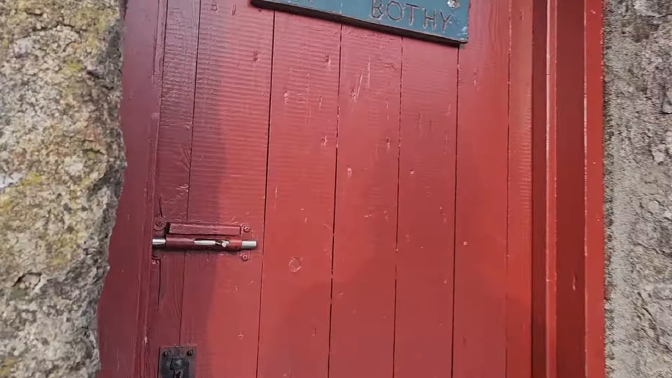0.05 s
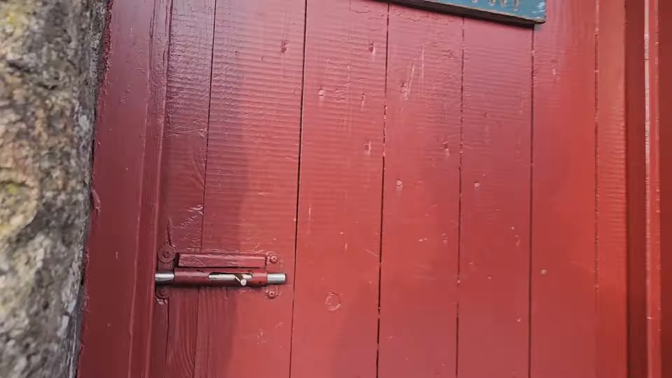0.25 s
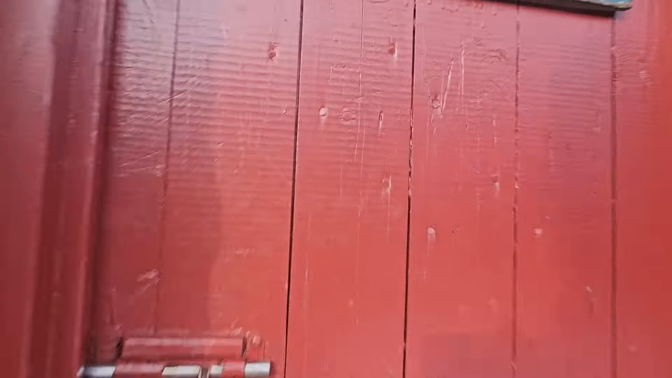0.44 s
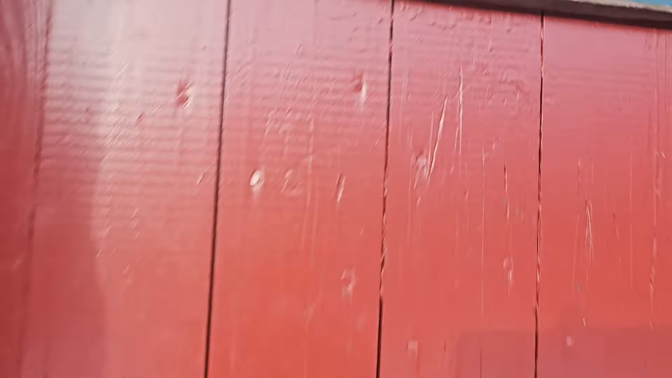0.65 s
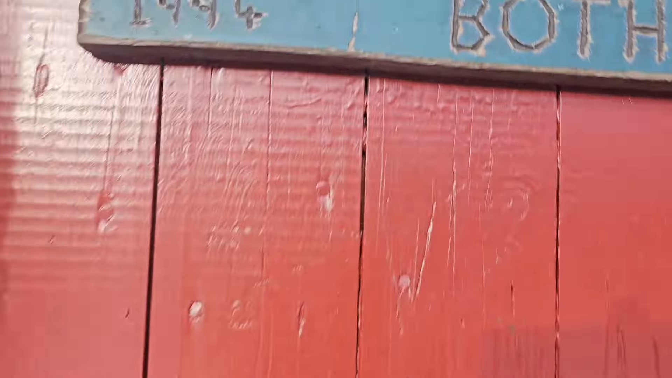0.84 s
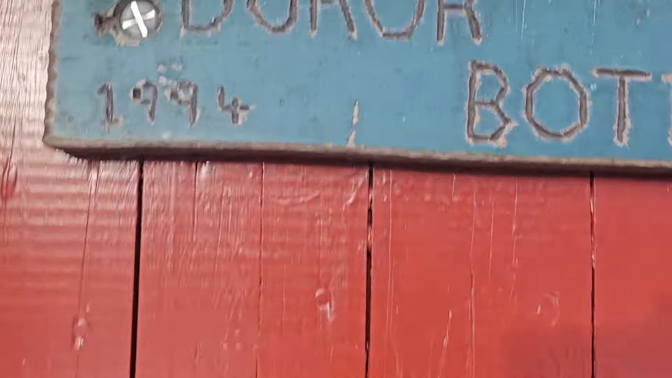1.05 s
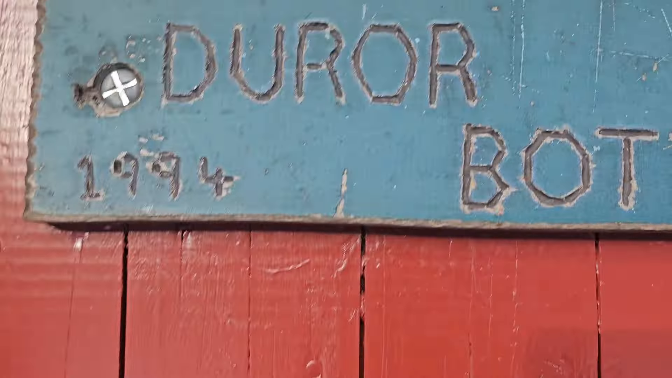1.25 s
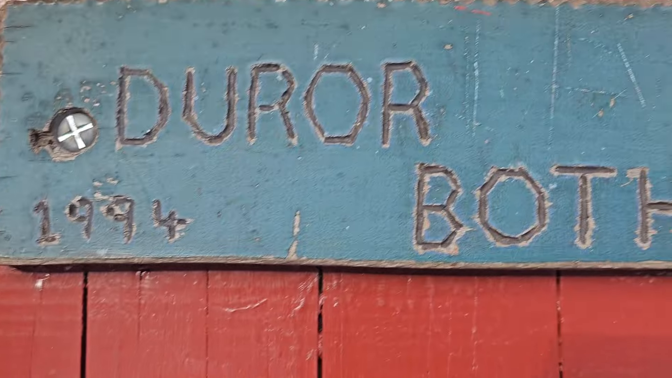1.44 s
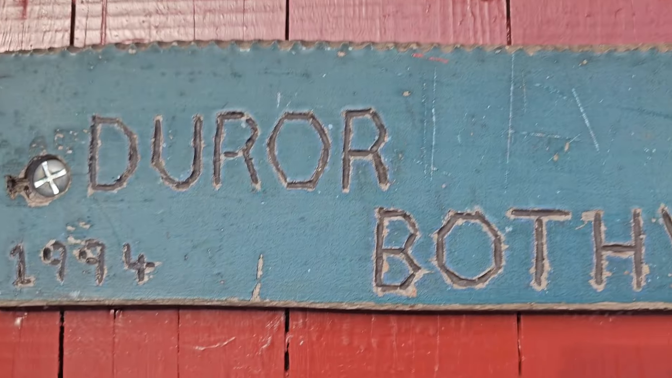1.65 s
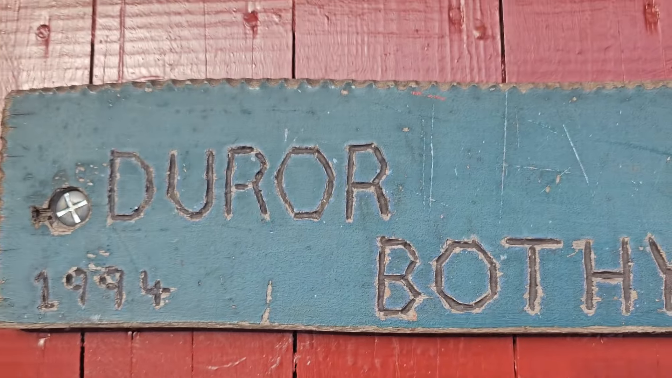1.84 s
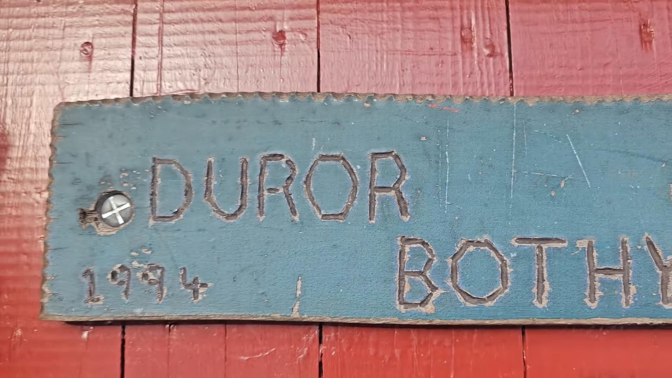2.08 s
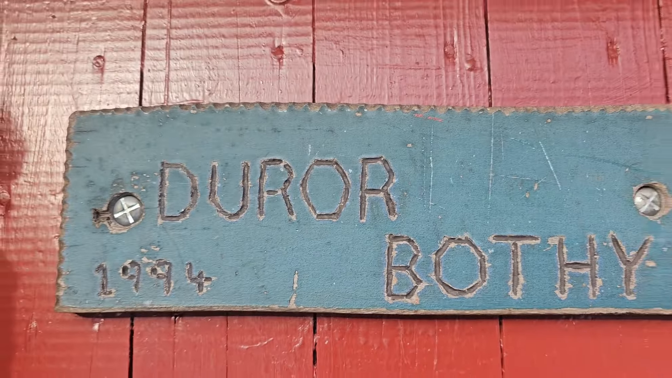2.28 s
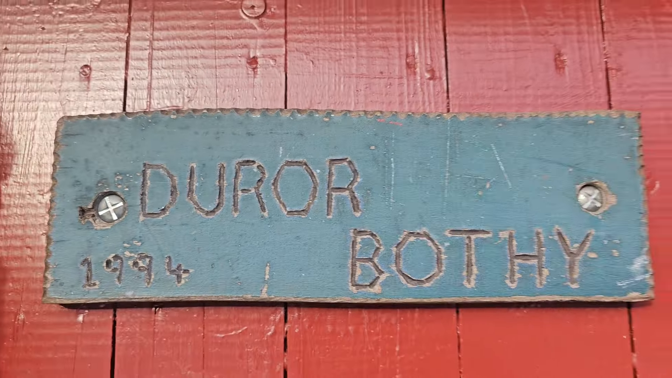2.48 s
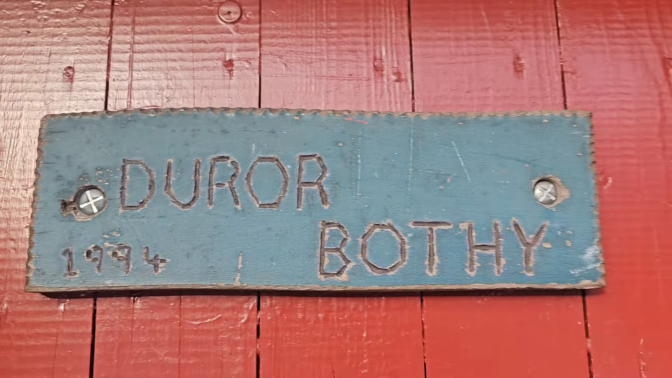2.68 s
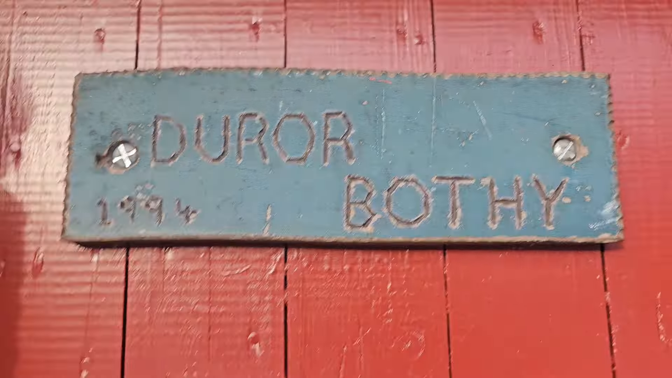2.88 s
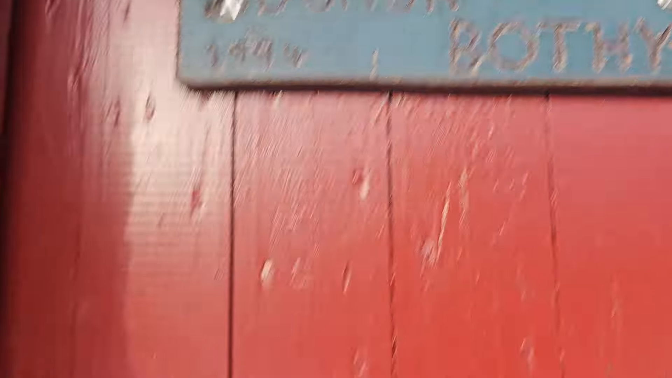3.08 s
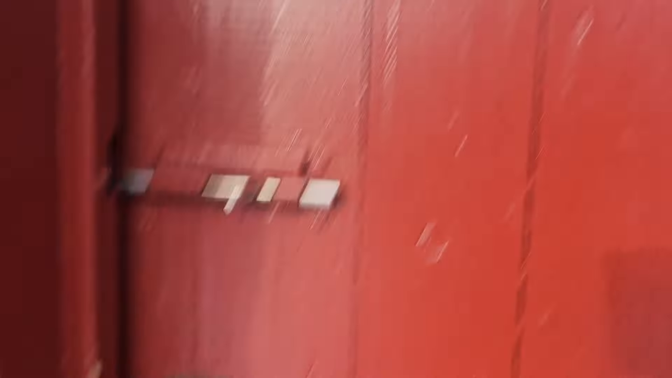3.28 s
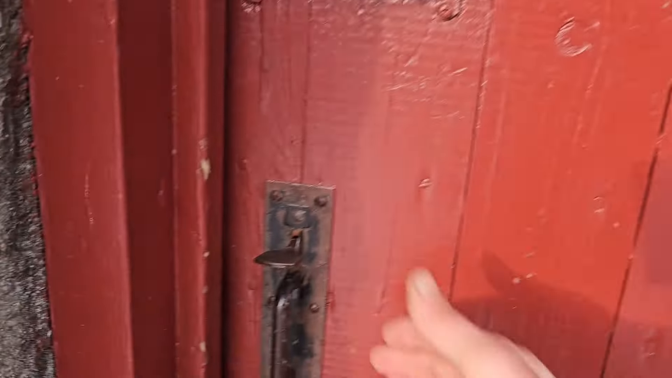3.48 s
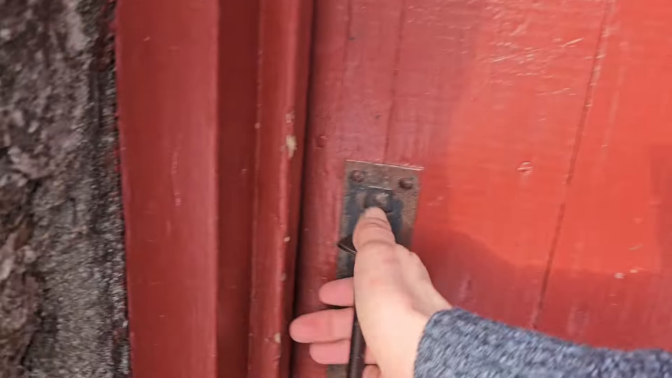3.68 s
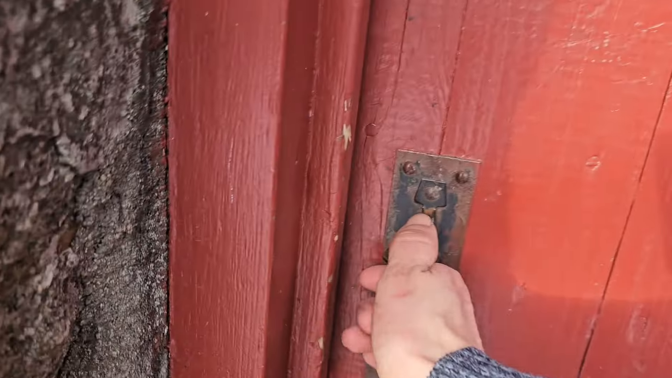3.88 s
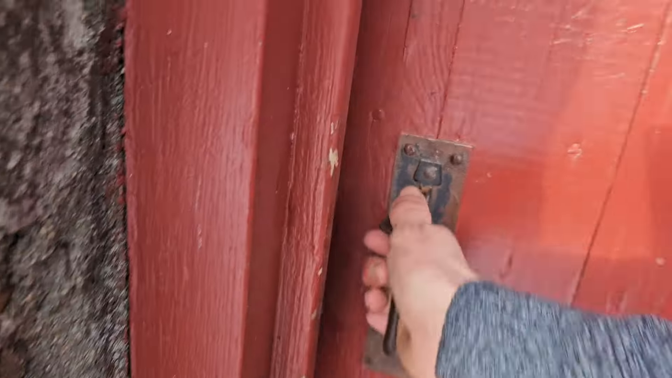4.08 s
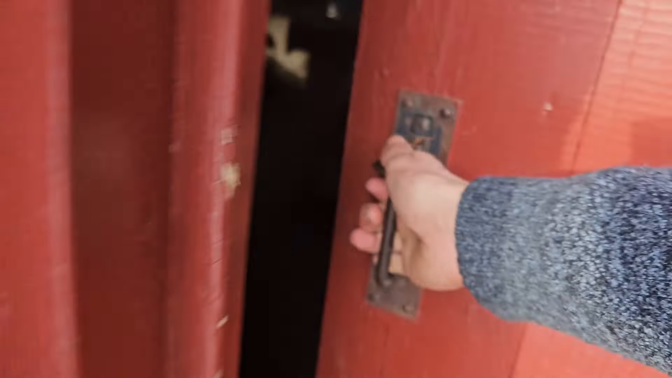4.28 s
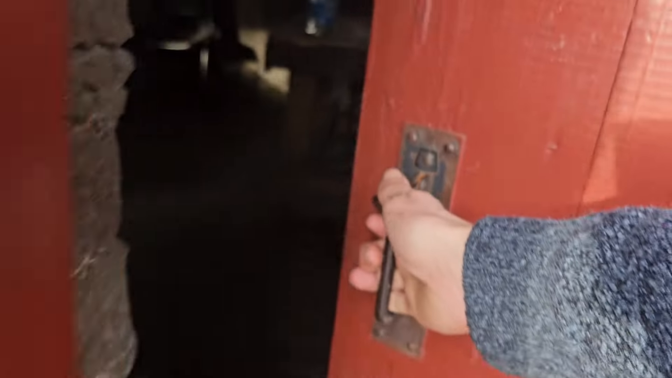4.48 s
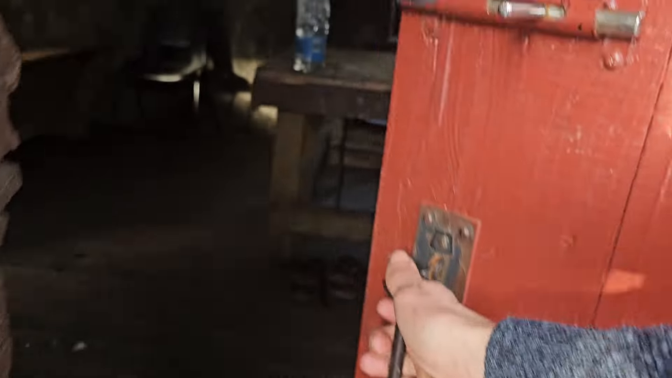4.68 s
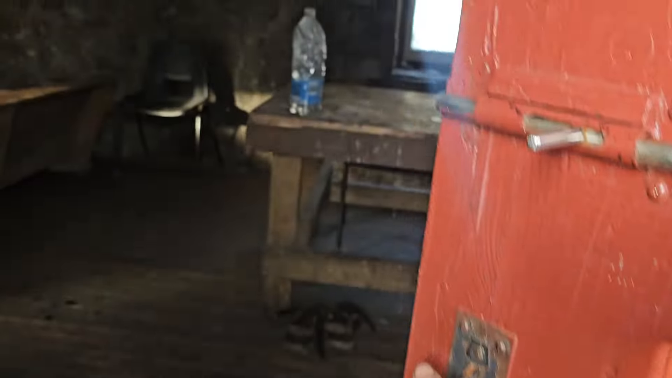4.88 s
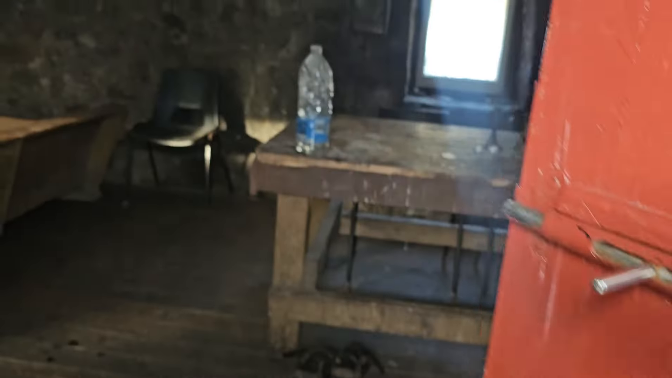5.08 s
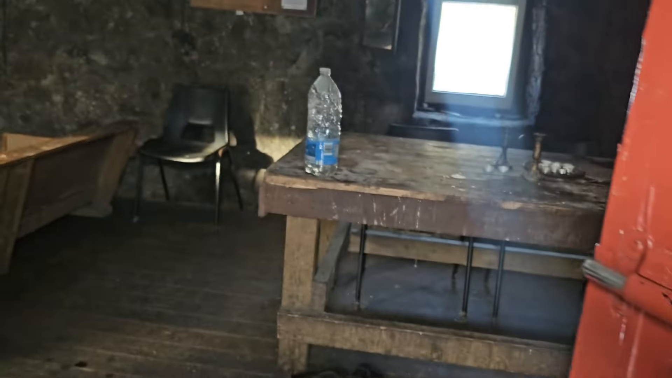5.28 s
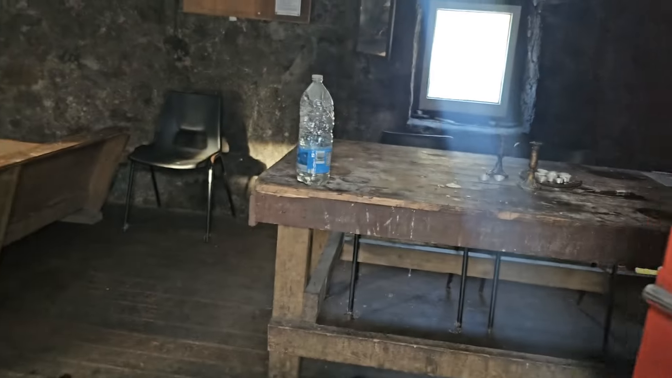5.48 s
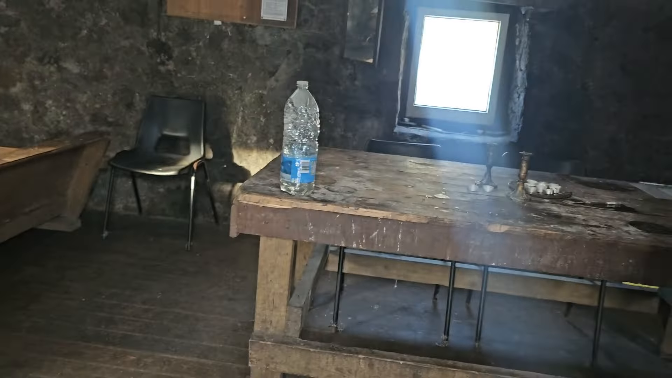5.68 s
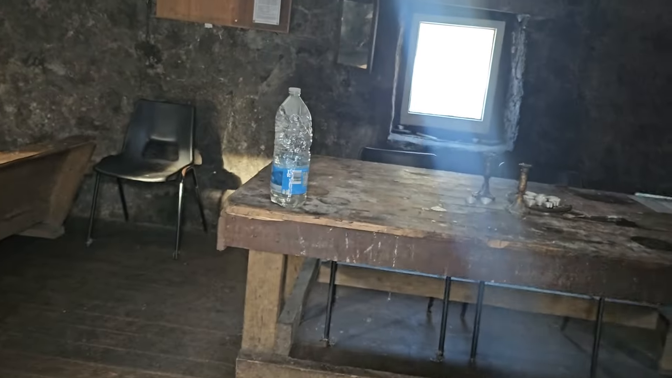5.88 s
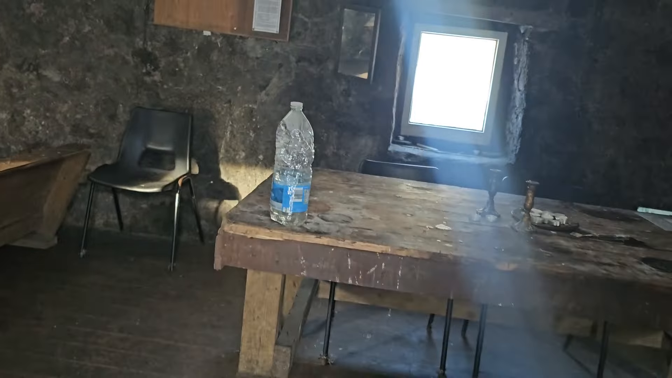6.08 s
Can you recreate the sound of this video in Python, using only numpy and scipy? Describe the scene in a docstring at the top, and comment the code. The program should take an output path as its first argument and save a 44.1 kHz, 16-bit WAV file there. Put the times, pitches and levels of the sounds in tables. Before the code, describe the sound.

Close handheld stereo microphone at a plank door in a stone wall. Soft thumps and grit crunches of shoes in the first second, faint distant air, light wind. After a quiet pause the iron thumb latch bangs in a rapid, bright cluster with woody knocks; a lighter cluster follows as the door scrapes free. The bare room echoes, hinges tick faintly, and loose iron rattles quietly before near-silence.

```python
"""At the plank door of a stone hut, someone steps up, presses the iron thumb latch and pushes the door open.
Latch blows are fading tones of planks, plate and bar plus short bursts of noise; they also echo in the bare room.
The door scrapes free in stick-slip jerks and its hinges tick; shoes thump and crunch on gritty stone.
Shaped noise makes the rustle of a sleeve, a little wind on the microphone and a distant rush of air."""
import sys
import numpy as np
from scipy import signal
from scipy.fft import rfft, irfft, next_fast_len
from scipy.io import wavfile
from scipy.ndimage import uniform_filter1d

SR = 44100
rng = np.random.default_rng(int(sys.argv[2]) if len(sys.argv) > 2 else 0)


def pcm_store(signal):
    """Save signal as 16-bit PCM."""
    levels = np.round(np.clip(np.atleast_2d(signal), -1, 1) * 32767)
    wavfile.write(sys.argv[1], SR, levels.astype(np.int16).T)


N = 270583  # length of the scene in samples
T = np.arange(SR // 2) / SR  # half a second of time, for short sounds [s]

# noise colour of the iron's clank, from dense short-lived tones: (frequency [Hz], level per Hz [dB])
CLANK_COLOUR = [(60, -32.5), (200, -14), (450, -10.5), (750, -4.5), (1250, 2.5), (2000, -11), (2800, -16),
                (4500, -25.5), (9000, -39.5)]


def amp(db):
    """Turns decibels into a plain multiplier."""
    return 10 ** (np.asarray(db) / 20)


def read(points, hz):
    """Reads a table between its points, with frequency spaced by octaves as the ear hears it."""
    f, value = np.transpose(points)
    return np.interp(np.log(hz + 1), np.log(f), value)


def unit(x):
    """Scales a stereo sound to the energy of ten milliseconds at full level."""
    energy = np.sum(x ** 2)
    return x / np.sqrt(energy / (2 * .01 * SR) + 1e-20)


def add(mix, s, sound):
    """Mixes a stereo sound in at time s, cutting off what runs past the end."""
    part = mix[:, max(round(s * SR), 0):][:, :sound.shape[1]]
    part += sound[:, :part.shape[1]]


def colour(x, spectrum, tilt_db=0, alike=None):
    """Gives two unrelated signals a spectrum and sets how alike left and right are at each pitch."""
    # used unless another table is given: (frequency [Hz], left-right correlation [-1 to 1])
    usual_alike = [(100, 0.97), (250, 0.89), (600, 0.86), (1200, 0.24), (2500, 0.17), (8000, 0.11)]
    size = next_fast_len(x.shape[1])
    hz = np.fft.rfftfreq(size, 1 / SR)
    a, b = rfft(x, size)
    angle = np.arccos(np.clip(read(alike or usual_alike, hz), -1, 1)) / 2
    shared, opposed = a * np.cos(angle), b * np.sin(angle)
    stereo = np.array([shared + opposed, shared - opposed])
    level_db = read(spectrum, hz) + tilt_db * np.log2(hz / 1000 + .1)
    return irfft(stereo * amp(level_db), size)[:, :x.shape[1]]


def noise(spectrum, size, tilt_db=0, alike=None):
    """Makes coloured stereo noise with an average (rms) level of 1."""
    x = colour(rng.standard_normal((2, size)), spectrum, tilt_db, alike)
    return x / x.std()


def ring(modes, tilt_db=0, spread=0):
    """A struck body sounds several fading tones; spread [radians] shifts their phase between left and right."""
    hz, db, t60 = np.transpose(modes)[:, :, None]
    t = T[:int(min(t60.max(), .5) * SR)]
    shift = spread * rng.choice([-1, 1], hz.shape)
    sign = (-1) ** np.arange(len(hz))[:, None] if spread else 1
    decay = sign * amp(db + tilt_db * np.log2(hz / hz[0]) - 60 * t / t60)
    waves = [(decay * np.sin(2 * np.pi * hz * t + side * shift)).sum(0) for side in (1, -1)]
    attack = 1 - np.exp(-t * hz.mean() * 4)
    return unit(np.array(waves) * attack)


def latch():
    """Each blow shakes planks, plate and bar; the wider the door stands open, the more enters the room."""
    # blows of the latch: (time [s], planks level [dB], iron clank level [dB], bar tick level [dB],
    # tick tilt [dB/octave]); each part is trimmed below
    blows = [ (3.630, -52, -53, -78, -9.5), (3.7040, -46, -31.5, -40, -2), (3.7156, -35, -25.5, -58, 0),
             (3.7229, -27.5, -23, -24, -2), (3.7511, -40, -23.5, -50, -3), (3.765, -17.5, -7, -43, -4),
             (3.7707, -20, -18.5, -29.5, -11), (3.7787, -17, -20, -29.5, -4), (3.811, -28, -32, -29.5, 2),
             (3.843, -48, -43.5, -35, 0), (3.8483, -25, -27.5, -17, -5.5), (3.934, -62.5, -65.5, -52, 0.5),
             (4.055, -61, -37, -41, -12), (4.1340, -31.5, -39.5, -33, 6), (4.143, -25, -33.5, -18, 3),
             (4.1490, -19, -35, -44, -6), (4.1620, -30, -41.5, -37.5, 2.5), (4.2577, -36.5, -44, -60, 2),
             (4.916, -50.5, -46, -47.5, -12.5), (5.0436, -62.5, -37, -39.5, -9.5),
             (5.054, -47.5, -32.5, -33.5, -8), (5.061, -46, -26.5, -56, -6),
             (5.0870, -40, -31, -46.5, -4.5), (5.1061, -33.5, -19, -24.5, -6),
             (5.1120, -30.5, -20, -44.5, -0.5)]
    # tones of the planks, door in its frame and swinging free: (frequency [Hz], level [dB], 60 dB fade [s])
    shut_planks = [(68.5, -6, 0.1), (163.5, -2, 0.099), (157, -18.5, 0.15), (236, -1, 0.06),
                   (291, -4, 0.07), (435.5, -12, 0.11), (488, -9, 0.024)]
    free_planks = [(78.7, -4, 0.37), (154, -16.5, 0.3), (198, 3, 0.08), (279.3, 7.5, 0.056),
                   (315, 8.5, 0.034), (414, -15, .05), (553, -15.5, 0.061)]
    # tones of the latch iron, pressed to its plate and hanging loose on the open door:
    # (frequency [Hz], level [dB], 60 dB fade [s])
    pressed_iron = [(635, -7, .07), (715, -9, .06), (815, -0.5, .08), (888, -7, .06), (1045, -3, .07),
                    (1185, 3, .035), (1260, -2, .03), (1384, 1.5, .06), (1580, -6, .035), (1690, 0, .04),
                    (1868, -3, .04), (2035, -3, .04), (2200, -7, .03), (2400, -9, .03)]
    loose_iron = [(595, -12, .06), (790, 0, .07), (940, -4, .05), (988, 0, .06), (1085, -2, .05),
                  (1245, 0, .06), (1410, -3, .04), (1560, -9, .03), (1860, -6, .04), (2300, -11, .03)]
    # high tones of the bar: (frequency [Hz], level [dB], 60 dB fade [s])
    bar_tones = [(3348, -1, 0.049), (3818, -2, 0.025), (3850, -2, 0.03), (4460, -9, 0.037),
                 (5580, -14.5, 0.025), (6780, -5, 0.058), (6120, -11, 0.017), (7460, -9, 0.052),
                 (7940, -7, .05), (11500, -11, 0.035), (12900, -11, 0.036), (14740, -10.5, 0.039)]
    # noise colour of the dense plank tones: (frequency [Hz], level per Hz [dB])
    knock_colour = [(80, -7), (250, -7), (520, -2.5), (750, -13), (1200, -17), (3000, -44), (9000, -60.5)]
    # noise colour of the bar's tick, near and once the door has swung away from the microphone:
    # (frequency [Hz], level per Hz [dB])
    near_tick = [(200, -38), (1200, -13), (2300, -5.5), (3600, 1), (4600, -1), (5600, -6), (7200, -6),
                 (9800, -11), (12000, -8), (15500, -6)]
    far_tick = [(200, -38), (1200, -13.5), (2300, -4.5), (3200, -5.5), (4200, -0.5), (5400, -7), (7500, -4),
                (9800, -13.5), (15500, -7)]
    # how far the door stands open: (time [s], open share of the doorway [0 to 1])
    door_gap = [(4.14, 0.059), (4.26, 0.88), (5.0, 1)]
    free_from_s, swung_from_s = 4.1, 4.4
    leak_db, open_db = -33.5, -9.5  # sound let into the room by the shut door and by the open doorway

    direct, inside = np.zeros((2, 2, N))
    for s, wood_db, iron_db, tick_db, tick_tilt in blows:
        if s < free_from_s:
            planks, iron, dull_db = shut_planks, pressed_iron, 0
        else:
            planks, iron, dull_db = free_planks, loose_iron, -1.5  # duller when it hangs loose
        iron_tilt = dull_db + .22 * (iron_db + 18)  # a harder clank is brighter
        tick_colour = near_tick if s < swung_from_s else far_tick
        knock, clank, tick = amp(wood_db - 8), amp(iron_db - 6.5), amp(tick_db - 1)

        boom = amp(wood_db) * ring(planks)
        plate = amp(iron_db - 4.0) * ring(iron, iron_tilt, spread=0.61)
        bar = amp(tick_db - 18) * ring(bar_tones, tick_tilt, spread=0.34)
        knock_crack = crack(knock_colour, 0, t60=0.03, rise=0.00054, tail_db=-29.5, tail_t60=.08)
        clank_crack = crack(CLANK_COLOUR, iron_tilt, t60=.024, rise=0.0012, tail_db=-31.5, tail_t60=0.2)
        tick_crack = crack(tick_colour, tick_tilt, t60=.009, rise=.0018, tail_db=-20, tail_t60=.045)
        cracks = knock * knock_crack + clank * clank_crack + tick * tick_crack
        for part in (boom, plate, bar, cracks):
            add(direct, s, part)

        radiated = knock * pulse(knock_colour, 0)
        radiated += clank * pulse(CLANK_COLOUR, iron_tilt)
        radiated += tick * pulse(tick_colour, tick_tilt)
        send = amp(leak_db) + amp(open_db) * np.interp(s, *np.transpose(door_gap))
        ring_send = amp(-9.5)  # the iron's ring carries into the room less than its crack
        for part in (boom, ring_send * plate, radiated):
            add(inside, s, send * part)
    return direct, inside


def crack(spectrum, tilt_db, t60, rise, tail_db, tail_t60):
    """Dense tones blur into noise that dies at once, then a short clatter between the stone jambs."""
    t = T[:8192]
    burst = amp(-60 * t / t60)
    clatter = amp(tail_db - 60 * t / tail_t60)
    attack = 1 - np.exp(-t / rise)
    return unit(doorway(noise(spectrum, len(t), tilt_db) * (burst + clatter) * attack))


def doorway(x):
    """Close hard surfaces repeat each sound within a few milliseconds."""
    # echoes from jambs, lintel and threshold: (left delay [s], right delay [s], level [dB])
    echoes = [(.0012, .0016, -15), (.0044, .0041, -15), (.0061, .0068, -12), (.0116, 0.012, -21.5)]
    out = x.copy()
    for left, right, db in echoes:
        add(out, left, amp(db) * x * [[1], [0]])
        add(out, right, amp(db) * x * [[0], [1]])
    return out


def pulse(spectrum, tilt_db):
    """One click with a smooth spectrum stands for a blow as it radiates in all directions."""
    x = np.zeros((2, 512))
    x[0, 128] = 1
    return unit(colour(x, spectrum, tilt_db))


def scrape():
    """Painted wood sticks and slips: uneven little jerks with a dry hiss."""
    # the door edge and the latch rubbing: (start [s], length [s], level [dB], slip rate [per s],
    # tilt [dB/octave], judder strength [times the hiss's rms])
    rubs = [(3.964, 0.042, -37.5, 268, 3.5, 0.39), (4.126, 0.019, -27.5, 720, 4.5, 1.6),
            (4.164, 0.073, -37.5, 200, -19.5, 0.25), (4.258, 0.05, -47, 900, 4, .4)]
    # noise colour of the rubbing: (frequency [Hz], level per Hz [dB])
    rub_colour = [(100, 5), (280, 20), (600, 13), (1200, 0.5), (2400, -10.5), (4200, -15), (8000, -35),
                  (10000, -31.5), (15000, -29)]
    out = np.zeros((2, N))
    for s, length, db, rate, tilt, share in rubs:
        size = int(length * SR)
        wander = uniform_filter1d(rng.standard_normal(len(T)), 60)
        turns = np.cumsum(rate * (1 + 0.41 * wander))[:size] / SR  # slips counted so far
        slips = np.exp(-(turns % 1) / 0.085)
        hiss = colour(slips * rng.standard_normal((2, len(T)))[:, :size], rub_colour, tilt)
        judder = np.sin(2 * np.pi * turns)  # the whole edge shudders at the slip rate
        fade = signal.windows.tukey(size, .7)
        add(out, s, amp(db) * (hiss / hiss.std() + share * judder) * fade)
    return out


def from_right(x):
    """Sound from the right side reaches the left microphone 21 samples later."""
    return np.array([np.roll(x[0], 21), x[1]])


def hinges():
    """Dry hinges slip at random, ticking faintly while the door swings."""
    swing_start_s, swing_end_s, ticks_per_s = 4, 5.03, 35
    t = np.arange(N) / SR
    swinging = (t > swing_start_s) * (t < swing_end_s)
    slips = (rng.random(N) < ticks_per_s / SR) * swinging
    return amp(-29.5) * colour(slips * rng.standard_normal((2, N)), CLANK_COLOUR, tilt_db=4)


def room(x):
    """The bare stone room answers with a diffuse tail that builds after the first wall is reached."""
    # how long the echo lasts: (frequency [Hz], 60 dB fade [s])
    fade_times = [(100, 1), (300, 0.47), (1000, 0.74), (2500, .7), (5000, 0.51), (8000, .5), (10000, 0.17),
                  (14000, 0.34)]
    # colour of the echo: (frequency [Hz], level [dB])
    echo_colour = [(80, -2), (300, 8.5), (520, -2), (800, 3), (1200, -4), (3000, -5.5), (8000, 2.5),
                   (10000, 0.5), (15000, -3)]
    flat = noise([(20, 0), (20000, 0)], SR)
    hz, t, z = signal.stft(flat, SR, nperseg=256)
    fade_db = -60 * t / read(fade_times, hz)[:, None]
    tail = signal.istft(z * amp(fade_db + read(echo_colour, hz)[:, None]), SR, nperseg=256)[1]
    tail *= np.clip((np.arange(tail.shape[1]) / SR - .006) / 0.011, 0, 1)  # silent for 6 ms, then builds
    return signal.fftconvolve(x, tail / np.linalg.norm(tail[0]), axes=1)[:, :N]


def steps():
    """A step is a soft thump and a crunch; a scuff is a crunch alone, usually longer and thinner."""
    # shoes set down on gritty stone: (time [s], thump level [dB], thump frequency [Hz],
    # thump 60 dB fade [s], grit level [dB])
    footfalls = [(0.096, -42, 225, .05, -48.5), (0.221, -45, 200, 0.11, -53),
                 (0.304, -45.5, 237, 0.063, -53.5), (.5400, -27, 103, 0.032, -38.5),
                 (.759, -46, 420, 0.041, -61), (.968, -34, 114, 0.068, -29), (.985, -29, 137, 0.051, -31.5),
                 (1.196, -62, 250, 0.038, -47.5), (1.742, -38.5, 149, 0.17, -56),
                 (3.026, -35.5, 126, 0.077, -43), (3.371, -55.5, 810, 0.03, -55.5),
                 (4.653, -48.5, 225, 0.025, -50.5), (5.746, -51.5, 100, 0.086, -54.5),
                 (5.873, -48.5, 199, .06, -54.5)]
    # soles dragged over the grit: (time [s], time to the peak [s], level [dB], tilt [dB/octave])
    scuffs = [(0.656, 0.0074, -54, 6.5), (.723, 0.024, -49.5, 0.5), (3.057, 0.01, -58.5, 4)]
    # noise colours of crushed grit and of a sliding sole: (frequency [Hz], level per Hz [dB])
    grit_colour = [(60, -19), (130, 8), (250, 9), (520, 7.5), (1000, -5.5), (1400, -4.5), (2500, -16.5),
                   (5000, -24.5), (10000, -33.5), (15000, -35)]
    drag_colour = [(100, -5), (400, 10), (800, 2), (1650, -5), (2100, -4), (2700, -22), (3700, -13),
                   (5000, -20.5), (15000, -31.5)]
    out = np.zeros((2, N))
    for s, thump_db, hz, t60, grit_db in footfalls:
        add(out, s, amp(thump_db) * ring([(hz, 0, t60)]))
        grit_tilt = 0.22 * (grit_db + 44.5)  # a heavier crunch is brighter
        add(out, s, amp(grit_db) * crunch(grit_colour, 0.0072, grit_tilt))
    for s, peak_s, db, tilt in scuffs:
        add(out, s, amp(db) * crunch(drag_colour, peak_s, tilt))
    return out


def crunch(spectrum, peak_s, tilt_db):
    """Grit gives way under a sole; a few stones crack louder than the rest."""
    sizes = amp(1.56 * np.minimum(rng.exponential(1, len(T)), 5))
    grains = colour(rng.standard_normal((2, len(T))) * sizes, spectrum, tilt_db)
    swell_and_fade = T / peak_s * np.exp(1 - T / peak_s)
    return grains / grains.std() * swell_and_fade


def sleeve():
    """Wool rustles in small bursts with each movement of the arm."""
    # arm movements: (peak time [s], rise [s], fall [s], level [dB]), before the flutter below
    movements = [(0, .05, 0.027, -41.5), (.19, 0.13, 0.085, -54), (.56, 0.047, .13, -52),
                 (1.03, 0.079, .05, -54), (3.07, 0.035, 0.15, -68.5), (4.0, 0.25, .1, -50.5),
                 (4.27, 0.14, 0.047, -48), (4.8, .1, 0.15, -62), (6.0, 0.23, 0.34, -80)]
    # noise colour of the cloth: (frequency [Hz], level per Hz [dB])
    cloth_colour = [(200, 6.5), (700, 1), (2000, -5), (4000, -13), (7500, -15), (9800, -21), (11700, -14),
                    (15500, -23.5)]
    still = amp(-74.5)  # while the arm rests
    motion = still + sum(amp(db) * swell(rise, fall, s) for s, rise, fall, db in movements)
    flutter = uniform_filter1d(rng.standard_normal(N), 900)
    return noise(cloth_colour, N) * motion * amp(2.4 * flutter / flutter.std() - 2.5)


def swell(rise, fall, peak):
    """A loudness curve that grows and dies exponentially around its peak."""
    t = np.arange(N) / SR - peak
    return np.exp(np.minimum(t / rise, -t / fall))


def wind():
    """A light breeze with a few puffs makes lumpy low noise on the microphone."""
    # puffs from the breeze and the moving door: (peak time [s], half width [s], level [dB]),
    # before the lumps below
    puffs = [(.02, 0.11, -48), (.52, 0.25, -42.5), (3.27, .13, -40.5), (3.852, .06, -39.5),
             (4.02, 0.089, -44), (4.2, 0.053, -33.5), (5.131, 0.15, -41), (5.98, 0.28, -57.5)]
    # noise colour of the wind: (frequency [Hz], level per Hz [dB])
    wind_colour = [(15, -25.5), (28, -11), (45, 1.5), (70, 1), (100, -1.5), (150, -15.5), (260, -18),
                   (600, -60.5)]
    t = np.arange(N) / SR
    breeze = amp(-58)  # between the puffs
    force = breeze + sum(amp(db) * np.exp(-((t - s) / width) ** 2) for s, width, db in puffs)
    lumps = uniform_filter1d(uniform_filter1d(rng.standard_normal(N), 2500), 800)
    return noise(wind_colour, N) * force * amp(1.9 * lumps / lumps.std() - 4.0)


def outdoors():
    """A steady distant rush of air, screened by the walls once the microphone is in the doorway."""
    # noise colour of the air: (frequency [Hz], level per Hz [dB])
    air_colour = [(30, -22.5), (60, -10.5), (100, 7), (150, -5), (200, -8), (330, -15), (480, -4),
                  (620, -7.5), (950, -12), (1250, -13.5), (2000, -22.5), (5000, -37), (10000, -50),
                  (15000, -44.5)]
    # likeness of the two sides in open air: (frequency [Hz], left-right correlation [-1 to 1])
    open_air_alike = [(100, 1), (300, 0.79), (600, .2), (1000, 0.33), (3000, 0.025)]
    t = np.arange(N) / SR
    db = -56 + np.where(t > 5.51, -3.5, 0)  # the shelter sets in at once, at 5.51 s
    return from_right(noise(air_colour, N, alike=open_air_alike)) * amp(db)


def scene():
    """The door in front of the room, with steps, sleeve, wind and the open air around."""
    # stereo balance of the door and room: (frequency [Hz], left minus right [dB])
    balance = [(100, 0.1), (300, 3), (1100, 2.5), (1500, 3.5), (2000, -6.5), (3500, 0.5), (8000, -4.5),
               (15000, -1)]
    direct, inside = latch()
    rubbing = from_right(scrape())
    door = direct + rubbing + hinges() + room(inside + amp(-14.5) * rubbing)
    size = next_fast_len(N)
    lean_db = read(balance, np.fft.rfftfreq(size, 1 / SR)) / 2
    door = irfft(rfft(door, size) * amp([lean_db, -lean_db]), size)[:, :N]
    around = steps() + outdoors() + wind() + sleeve()
    return door + around * amp([[.6], [-.6]])  # slightly louder on the left


def record(dry):
    """The microphone drops the deepest bass, peaks round off near full scale; then the top treble is cut."""
    bass_cut = signal.butter(2, 25, "highpass", fs=SR, output="sos")
    lean = signal.sosfilt(bass_cut, dry)
    limited = lean / (1 + lean ** 6) ** (1 / 6)
    treble_cut = signal.firwin(301, 16100, window=("kaiser", 9), fs=SR)  # cutoff in Hz
    return signal.oaconvolve(limited, treble_cut[None], "same")


dry = scene()
out = record(dry)
pcm_store(out)
```